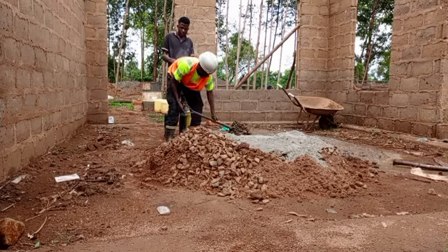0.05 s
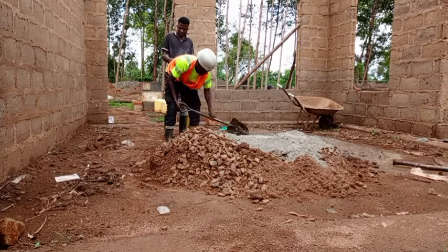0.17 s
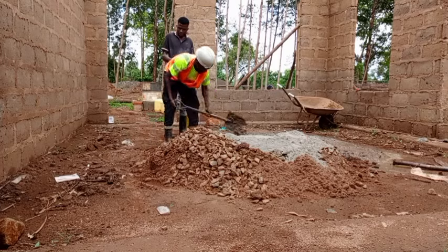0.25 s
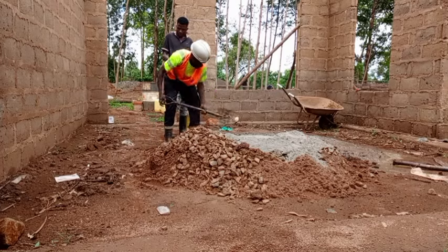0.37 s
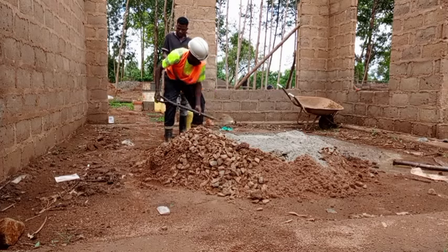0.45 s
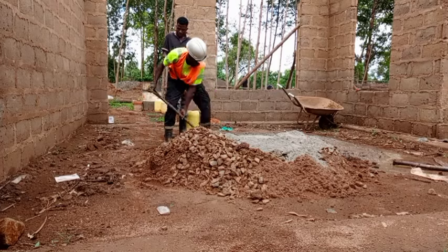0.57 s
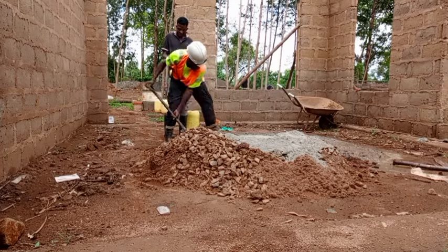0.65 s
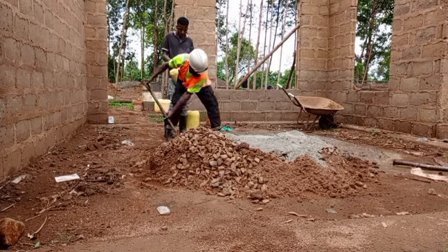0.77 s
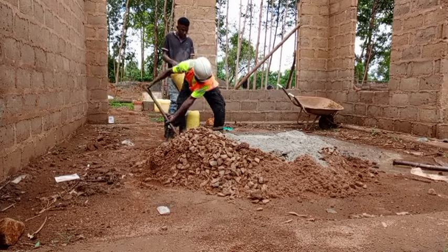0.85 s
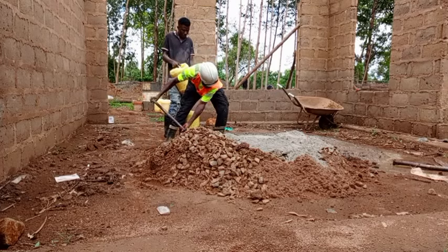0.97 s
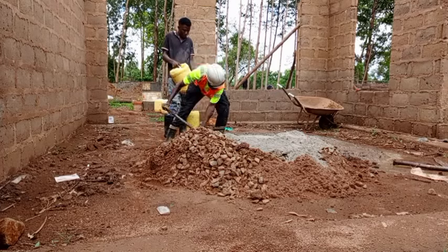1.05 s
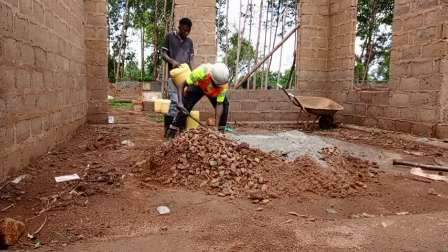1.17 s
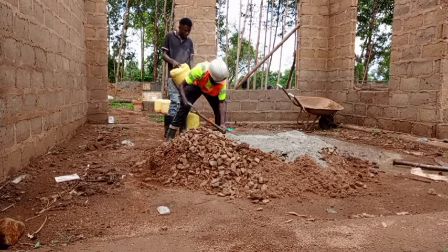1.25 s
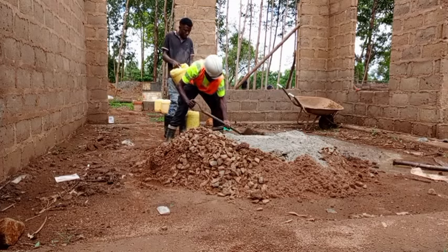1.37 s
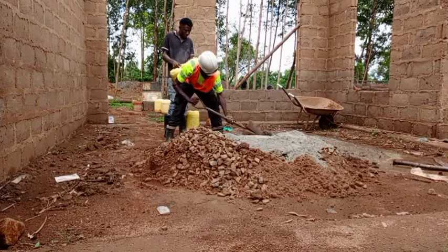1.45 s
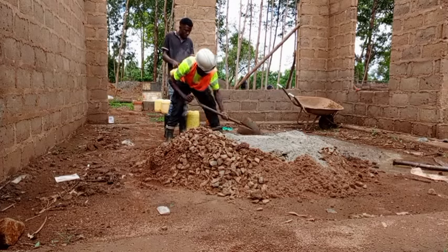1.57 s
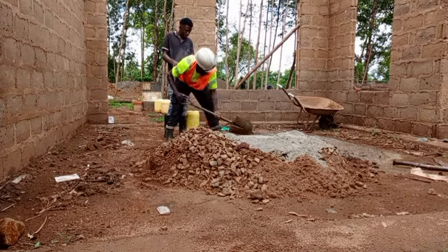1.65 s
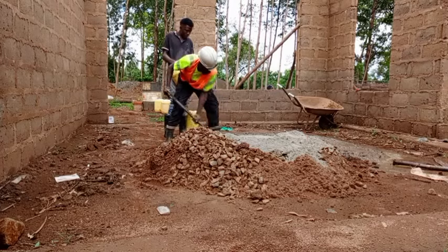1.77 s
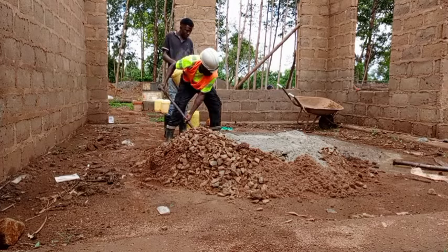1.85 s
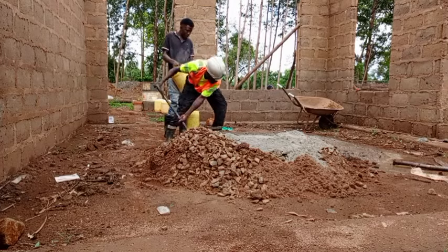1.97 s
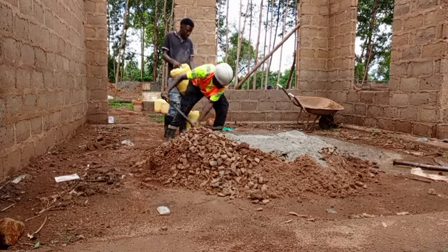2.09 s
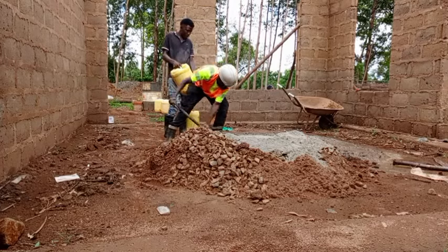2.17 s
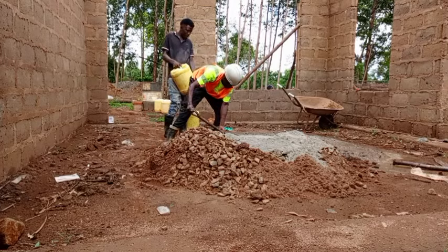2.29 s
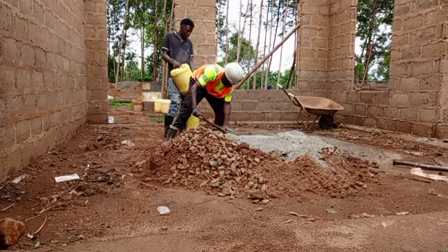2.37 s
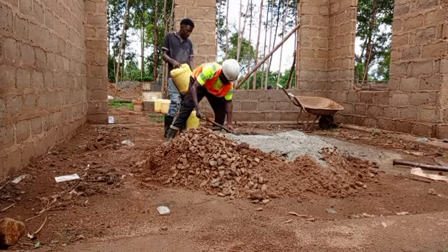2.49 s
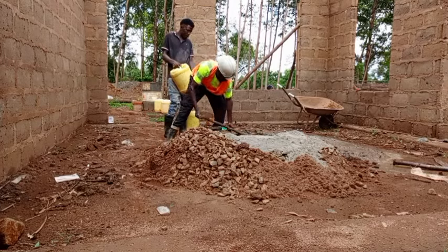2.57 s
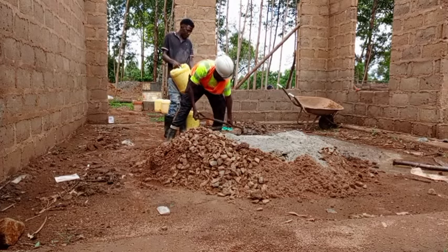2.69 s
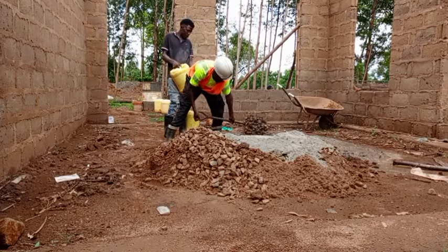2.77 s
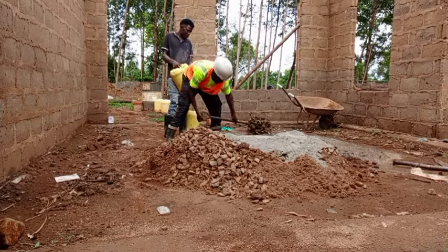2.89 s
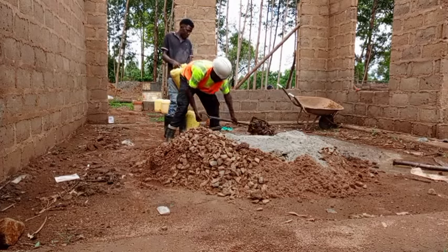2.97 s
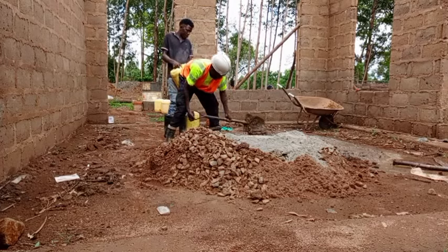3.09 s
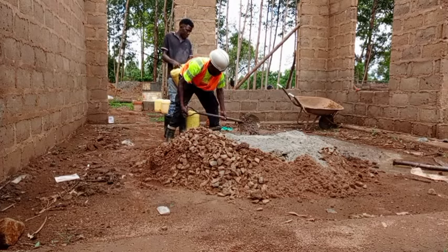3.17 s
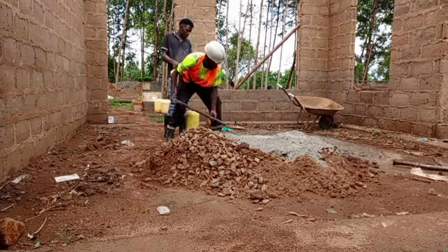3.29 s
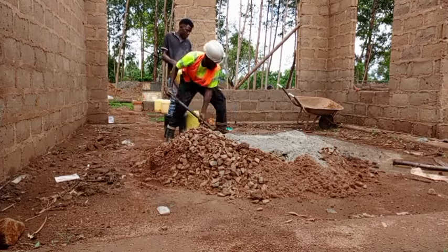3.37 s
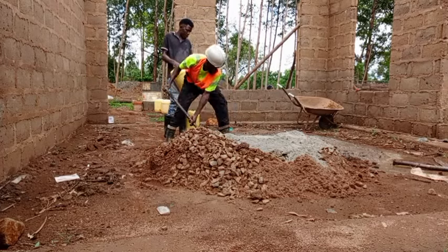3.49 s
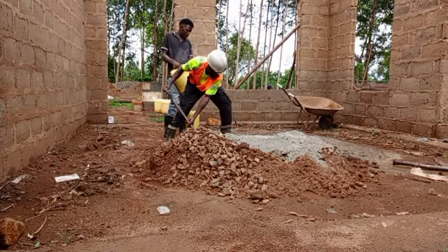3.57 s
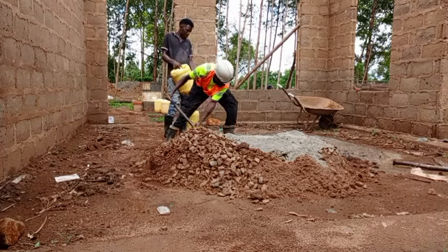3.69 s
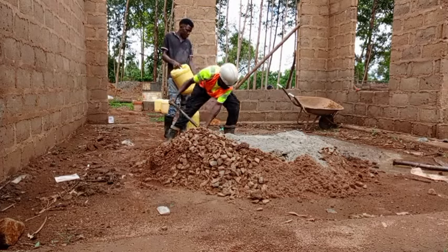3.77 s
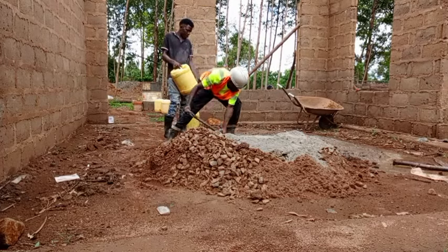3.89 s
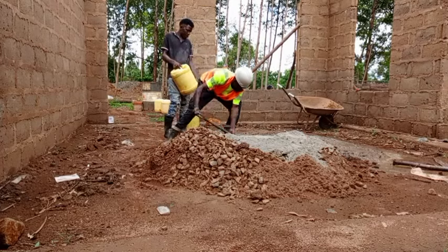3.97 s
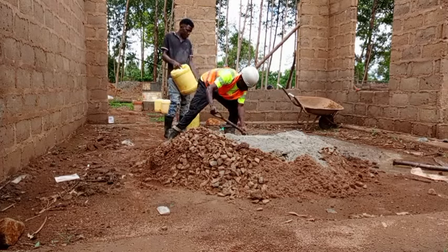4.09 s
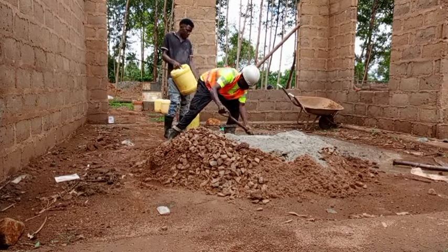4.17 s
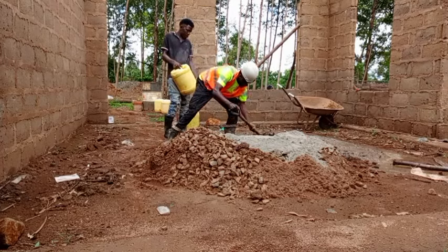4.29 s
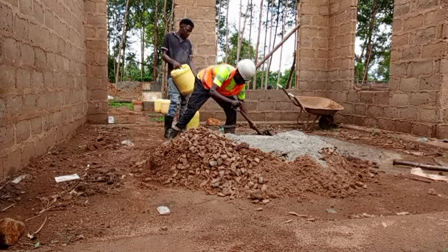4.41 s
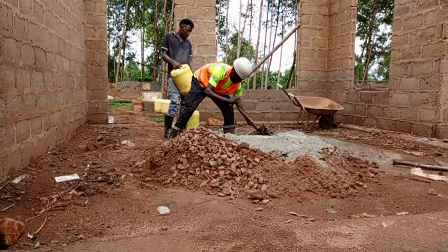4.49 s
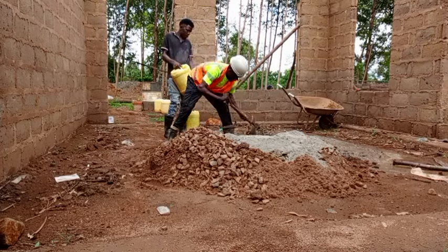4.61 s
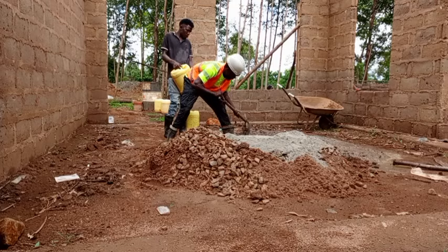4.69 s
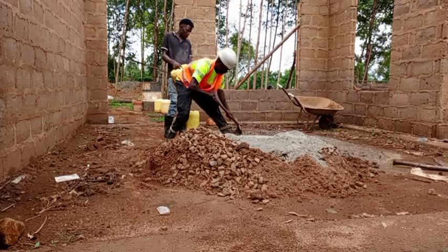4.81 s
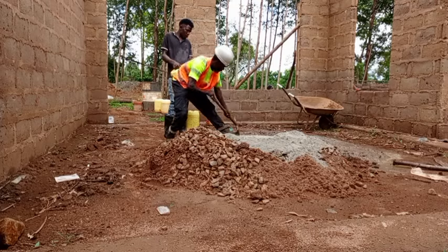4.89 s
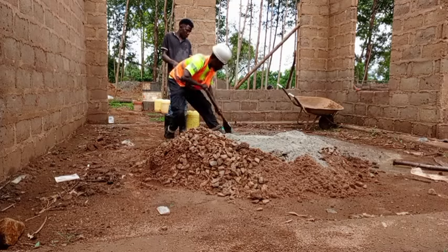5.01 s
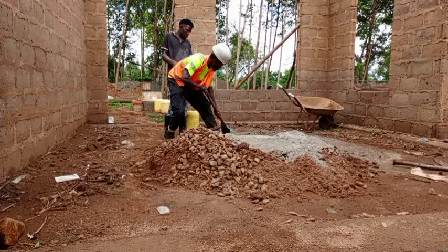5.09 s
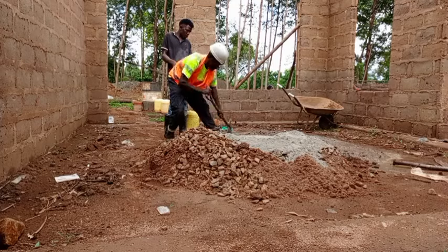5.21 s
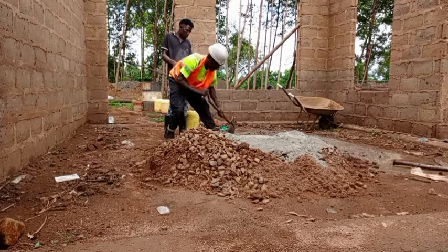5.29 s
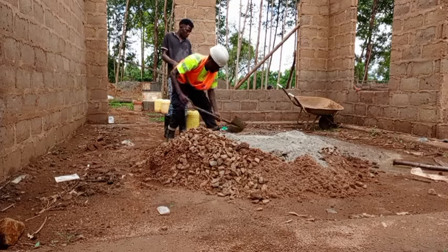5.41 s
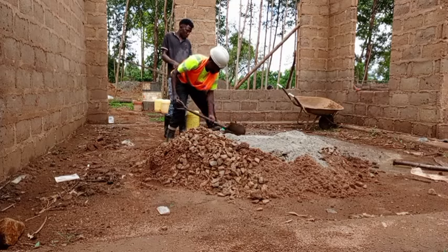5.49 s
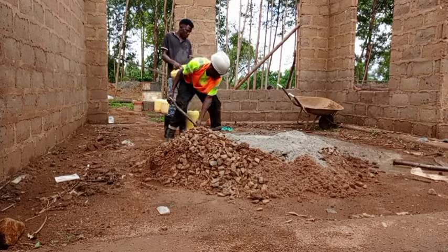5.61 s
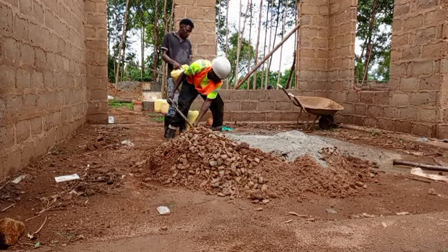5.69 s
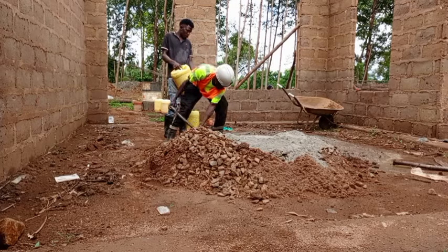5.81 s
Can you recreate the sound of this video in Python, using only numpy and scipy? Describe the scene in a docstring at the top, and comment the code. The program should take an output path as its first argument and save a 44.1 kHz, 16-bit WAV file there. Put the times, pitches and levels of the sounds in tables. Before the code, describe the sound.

A steel shovel repeatedly crunches and scrapes into gravel, stones clinking on the blade, over a faint, uneven low rumble.

```python
"""A steel shovel driven into a heap of gravel and cement, between roofless brick walls.
Stones knock in the heap and grate along the blade, grit makes the steel sing, sand hisses off it,
and single stones strike it with a crack, a clink and a thud. The near walls return short echoes.
Behind the work a low two-tone drone swells and drops out beneath a faint outdoor hush.
One microphone, with the deepest bass and the very top rolled off."""
import sys
import numpy as np
from scipy import signal
from scipy.fft import rfft, irfft, next_fast_len
from scipy.io import wavfile
from scipy.ndimage import uniform_filter1d

SR = 44100
rng = np.random.default_rng(int(sys.argv[2]) if len(sys.argv) > 2 else 0)


def file_out(sig):
    """Save sig as 16-bit WAV at sys.argv[1]."""
    # one column per channel
    cols = np.atleast_2d(sig).T
    # limit, then scale
    lim = np.clip(cols, -1, 1)
    pcm = np.round(lim * 32767).astype(np.int16)
    wavfile.write(sys.argv[1], SR, pcm)


N = 257984

# modes of the steel blade: (frequency [Hz], relative level [dB], t60 before damping [s])
BLADE_MODES = [(258, -30, 0.3), (398, -8, 0.2), (976, -20, 0.15), (1157, -24, 0.2), (2420, -18, 0.14),
               (2710, -15, 0.09), (3275, -5, 0.25), (3730, -13, 0.12), (3960, -10, 0.14), (4600, -6, 0.3),
               (4960, -8, 0.15), (5660, -11, 0.25), (5820, -7, 0.3), (6250, -15, 0.15), (6490, -12, 0.15),
               (6869, -13, 0.18)]
# colour of running sand: (frequency [Hz], relative level [dB])
SAND_SPECTRUM = [(6200, -15.5), (7200, -5), (8300, -11.5), (11000, -7), (13500, -13), (14800, -14.5),
                 (15600, -8.5), (16500, -15)]


def heap():
    """Rumble, knocks, grating, grit and sand as the blade shifts the load, in jerks they all share."""
    # colours of the moving gravel, deep to bright: (frequency [Hz], relative level [dB])
    rumble_spectrum = [(110, -16), (160, -11), (240, 2), (340, 10.5), (420, 8)]
    stone_spectrum = [(280, -31), (370, 4.5), (500, 6.5), (620, 6), (870, 2.5), (1100, -26)]
    grating_spectrum = [(750, -26), (920, 2), (1150, -5), (1520, -1.5), (1860, -9), (2550, -12),
                        (3100, -35.5)]
    grit_spectrum = [(2200, -12), (2700, -2.5), (3400, 5), (4300, 2.5), (5400, 2.5), (6500, -0.5),
                     (7200, -12.5), (8200, -33.5)]
    stones_db, rumble_db, grating_db, grit_db, free = strokes()
    sand_db = np.maximum(grit_db - 12.5, -91)    # a trickle that never stops
    jerks = drift(29)
    rumble = grains(rumble_spectrum, rumble_db, 0.53 * jerks, per_s=900, spread_db=3.5, cycles=33.5,
                    count=10)
    stones = grains(stone_spectrum, stones_db, 0.77 * jerks, per_s=900, spread_db=2, cycles=33, count=14)
    grating = grains(grating_spectrum, grating_db, 1.6 * jerks, per_s=4000, spread_db=2, cycles=73,
                     count=20, dull_db=13)
    grit = grains(grit_spectrum, grit_db, 2.3 * jerks, per_s=9000, spread_db=2.5, cycles=62)
    sand = grains(SAND_SPECTRUM, sand_db, 2.1 * jerks, per_s=7000, spread_db=2.5, cycles=270)
    steel_share = np.interp(free, [0, 1], [.08, .5])    # of the grit's power
    steel = np.sqrt(steel_share) * from_db(grit_db) * singing_blade()
    return rumble + stones + grating + np.sqrt(1 - steel_share) * grit + sand + steel


def strokes():
    """Levels of stones, rumble, grating and grit, and how free the blade is of its load (0-1)."""
    # heavy thrusts and throws, then light drags and knocks, one curve a stroke: (time [s], stones [dB],
    # rumble [dB above stones], grating [dB above stones], grit [dB above stones])
    thrusts = [
        [(0.93, -61.5, 6, -11, -4), (0.976, -29, -20, -6.5, -8), (1.01, -39, 5.5, 8.5, 5),
         (1.038, -23.5, -9.5, -11.5, -13.5), (1.064, -35.5, -1, -3.5, -8.5), (1.202, -36, -7.5, -9.5, -14),
         (1.256, -41, -10, -8, -20.5), (1.394, -43.5, 2.5, -6, -9), (1.5, -55, -20.5, 1.5, -12.5)],
        [(2.04, -94, 14, -41, -5), (2.062, -41.5, -4.5, -10, -4.5), (2.21, -30.5, -6.5, -0.5, -8),
         (2.23, -21.5, -4.5, -8.5, -13.5), (2.302, -30.5, 0, -1.5, -8), (2.424, -26.5, -6, -7, -14),
         (2.598, -44.5, 3, -8, -17), (2.702, -44, -4.5, -10.5, -13), (2.8, -63, -22.5, -5, -4.5)],
        [(2.81, -56, -25, 4, -3), (2.902, -51, -33, -8.5, -16.5), (2.944, -49, -16, 4.5, -0.5),
         (2.978, -48, -6.5, 1, -1), (3.118, -39.5, -20, -3, -5), (3.29, -56.5, 1, 4, -0.5),
         (3.352, -62, -7, 2, -13.5), (3.406, -72, -18, -19, -14), (3.45, -101, 21, 16, 8)],
        [(3.63, -66, -3.5, 3.5, 4), (3.734, -37, -9, -11.5, -15.5), (3.818, -39, -7.5, -2, -6.5),
         (3.856, -43, -7, 2, 0.5), (3.868, -33, -7, 3.5, -3.5), (3.952, -31, -11.5, -6, -8),
         (3.98, -29.5, -6, -3, -8), (4.056, -36, 0, -1, -4.5), (4.2, -34, 4, -7, -14.5)],
        [(4.21, -33, -8, -6.5, -13.5), (4.234, -40.5, 11, -5, -12), (4.252, -34.5, -1, -3, -14.5),
         (4.344, -36, 6, -3, -12.5), (4.492, -33.5, -16.5, -9, -16.5), (4.518, -41, -11.5, -1, -1),
         (4.69, -49.5, -10.5, -7, -5), (4.722, -51, -7.5, -4.5, -5), (4.75, -44.5, 4, -22, -23.5)],
        [(4.76, -47.5, -9.5, -11, -7), (4.826, -34.5, -5, -4.5, -4), (4.852, -37.5, -11, -4.5, -11.5),
         (4.976, -46, -10.5, -3.5, -1), (5.128, -37.5, -1, -4.5, -7.5), (5.19, -42.5, 3.5, -5.5, -13.5),
         (5.274, -55, -10, -4.5, -9.5), (5.32, -68.5, -33.5, -28, -35), (5.37, -85.5, 6.5, -6, 1.5)],
    ]
    drags = [
        [(0.0, -61.5, -11, 0, -11), (0.106, -54, -22.5, -10, -20), (0.198, -45.5, -47, 1, -1),
         (0.292, -55, -13, 1, -9), (0.354, -59, -34, -3.5, -6), (0.45, -92, 6, -18, 3)],
        [(0.62, -90, 9, -11, -2), (0.698, -69.5, 18, -7, -5), (0.768, -47, -7, -11, -23),
         (0.844, -62.5, 0, -3.5, -9), (0.856, -51.5, -8, -15, -27), (0.92, -68, 0, -19, -1)],
        [(1.51, -54.5, -32, -5, -10), (1.594, -52.5, -28, 7.5, 3), (1.692, -50, -28, -9, -12.5),
         (1.75, -59.5, -18, 3.5, -0.5), (1.818, -82, -4, 4, -8), (1.83, -101, -13, -24, -18)],
        [(1.84, -68, 1, -36, -21), (1.856, -43, -10, -4, 6.5), (1.89, -45, 9.5, -14, -1),
         (1.93, -56.5, 9, -14, 2), (1.998, -90, 14, -10, 20), (2.03, -93, 8, -2.5, -11)],
        [(3.47, -90, 17, -26, 19), (3.488, -66, -1, -16, -13), (3.496, -49, -16, -13, -15),
         (3.524, -44, -2, -9.5, -13.5), (3.578, -60.5, -12, -9, -10.5), (3.62, -65.5, 13, -17, -14)],
        [(5.73, -83, -4, -14.5, -13), (5.762, -64, -18, -7, 2.5), (5.778, -51.5, -21, -14, -11.5),
         (5.808, -49, 0.5, -4.5, -4.5), (5.838, -44, -21, -10, -15), (5.85, -51, 1, -4, -4)],
    ]
    times, *columns = np.transpose(sorted(row for stroke in thrusts + drags for row in stroke))
    stones_db, *above_db = [np.interp(np.arange(N) / SR, times, column) for column in columns]
    rumble_db, grating_db, grit_db = stones_db + np.array(above_db)
    free = np.interp(grit_db, [-59, -50], [1, 0])    # loud grit means a buried blade
    for stroke in drags:
        free[int(stroke[0][0] * SR):int(stroke[-1][0] * SR)] = 1    # a dragged blade carries no load
    return stones_db, rumble_db, grating_db, grit_db, uniform_filter1d(free, size=441)


def grains(spectrum, level_db, jerk_db, per_s, spread_db, cycles, count=26, dull_db=0):
    """Random contacts of uneven size, each ringing for some cycles at one of `count` pitches."""
    sizes = from_db(spread_db * np.minimum(rng.exponential(1, N), 5)) * rng.choice([-1, 1], N)
    contacts = sizes * (rng.random(N) < per_s / SR)
    pitch_index = rng.integers(0, count, N)
    light = np.clip((level_db.max() - level_db - 19.5) / 16, 0, 1)    # 0 full thrust, 1 light drag
    patchy_db = 2 + 3 * light    # a light drag lets a few pitches sing at a time
    low_hz, high_hz = spectrum[1][0], spectrum[-2][0]
    pitches = np.geomspace(low_hz, high_hz, count) * rng.uniform(.985, 1.015, count)
    out, power = np.zeros(N), np.zeros(N)
    for k, hz in enumerate(pitches):
        ringing = ring(contacts * (pitch_index == k), hz, cycles / hz)
        pitch_db = at_hz(spectrum, hz) - dull_db * light * k / count + patchy_db * drift(6.5)
        gain = from_db(pitch_db) * np.sqrt(hz)    # log-spaced pitches cover more Hz higher up
        out += gain * rms_one(ringing)
        power += gain ** 2
    skirts = [(spectrum[0][0] / 2, -60), spectrum[0], (low_hz, 0),
              (high_hz, 0), spectrum[-1], (spectrum[-1][0] * 2, -60)]
    return from_db(level_db + jerk_db) * coloured(out / np.sqrt(power), skirts)


def singing_blade(per_s=1500, damped_t60_s=.03):
    """Sliding grit rings the upper blade modes by turns, damped by a film of gravel; rms 1."""
    out = np.zeros(N)
    for hz, level_db, t60 in BLADE_MODES:
        if 2600 < hz < 7000:
            taps = (rng.random(N) < per_s / SR) * rng.standard_normal(N)
            ringing = rms_one(ring(taps, hz, min(t60, damped_t60_s)))
            out += from_db(level_db / 2 + 5 * drift(8)) * ringing
    return rms_one(out)


def stone_strikes(crack_s=.0026, spray_s=.006, thud_t60_s=.2, blade_t60_s=.14):
    """Each stone cracks, clinks, thuds, sprays sand and rings the blade, more so when it is empty."""
    # single stones on the steel: (time [s], crack base level [dB], clink pitch [Hz],
    # thud base level [dB], thud pitch [Hz])
    hits = [(0.0034, -55, 3870, -56, 380), (0.0327, -48, 2710, -52, 630), (0.046, -49.5, 2300, -56, 600),
            (0.1364, -48, 5290, -32.5, 672), (0.176, -41, 2720, -34, 660), (0.2398, -51, 2570, -37, 676),
            (0.2977, -42, 3570, -47, 795), (0.6733, -58, 4900, -67, 320), (0.955, -38, 3080, -34, 390),
            (0.9688, -25.5, 2320, -20.5, 710), (1.0328, -14, 2310, -8, 720),
            (1.1494, -36, 2130, -18.5, 729), (1.1914, -34, 2180, -21.5, 635),
            (1.3535, -37.5, 3680, -50, 282), (1.412, -48, 3490, -44, 404), (1.5574, -58, 5500, -34, 730),
            (1.726, -47, 3480, -53.5, 708), (1.779, -55, 3970, -52.5, 500), (1.8533, -27, 3275, -30, 398),
            (1.8585, -28, 4960, -28, 370), (2.07, -34, 5200, -32, 482), (2.0644, -34, 3230, -21.5, 359),
            (2.1378, -36, 4880, -22, 724), (2.1626, -22, 3270, -23, 530), (2.176, -19, 2050, -11.5, 657),
            (2.2093, -19.5, 2040, -30, 660), (2.2321, -35, 2090, -6, 628), (2.3426, -31, 5460, -18, 507),
            (2.3821, -25, 5600, -8.5, 502.5), (2.4806, -27.5, 2030, -19, 590),
            (2.7503, -47.5, 4300, -54, 490), (2.8156, -52, 2030, -37, 590), (2.8828, -48, 2000, -47, 610),
            (2.927, -41, 1990, -48, 955), (3.0445, -33, 3420, -23.5, 461), (3.157, -26.5, 4050, -53, 534),
            (3.2625, -33, 3260, -50, 1035), (3.456, -55.5, 4420, -66, 333), (3.493, -60, 3780, -29, 443),
            (3.6431, -54, 4000, -36, 705), (3.7223, -30, 2360, -41, 470), (3.7766, -38, 4450, -23, 690),
            (3.8305, -21, 2250, -19, 721), (3.8678, -26.5, 2230, -8.5, 632), (4.135, -28, 3530, -17, 599),
            (4.2543, -24.5, 2100, -15, 752), (4.6037, -33.5, 3620, -29, 712),
            (4.7165, -40.5, 6400, -32.5, 467), (4.8282, -24, 2190, -18, 733), (4.8984, -30, 3490, -26, 465),
            (5.0188, -33, 4800, -24.5, 393), (5.1028, -25, 4840, -34.5, 683),
            (5.765, -54, 6980, -46.5, 559)]
    times, cracks_db = np.transpose(hits)[:2]
    starts = np.round(times * SR).astype(int)
    free = strokes()[-1][np.maximum(starts - SR // 40, 0)]    # 25 ms before each hit
    ring_db = cracks_db - 24 + 15 * free
    scatter_db = rng.normal(0, 0.82, (len(hits), len(BLADE_MODES)))
    out, sprays = np.zeros(N), np.zeros(N)
    for k, (hz, level_db, t60) in enumerate(BLADE_MODES):
        blows = np.zeros(N)
        blows[starts] = from_db(ring_db + level_db + scatter_db[:, k])
        out += ring(blows, hz, min(t60, blade_t60_s))
    click = signal.unit_impulse(SR // 5)
    crack_decay = np.exp(-np.arange(len(click)) / (crack_s * SR))
    for start, empty, (_, crack_db, clink_hz, thud_db, thud_hz) in zip(starts, free, hits):
        splinters = rng.standard_normal(len(click)) * crack_decay
        snap = band_pass(splinters - 0.75 * click, 0.35 * clink_hz, 1.3 * clink_hz)
        crack = from_db(crack_db + 2 - 6 * empty) * snap    # an empty blade pings more than it cracks
        clink = from_db(crack_db - 7) * ring(click, clink_hz, t60=.036 + .035 * empty)
        overtone = 0.62 * ring(click, 1.25 * thud_hz, 0.053 * thud_t60_s)
        thud = from_db(thud_db - 12.5) * (ring(click, thud_hz, thud_t60_s) + overtone)
        out[start:start + len(click)] += (crack + clink + thud)[:N - start]
    sprays[starts] = from_db(cracks_db - 28.5)
    spray_envelope = signal.lfilter([1], [1, -np.exp(-1 / (spray_s * SR))], sprays + 1e-18)
    return out + spray_envelope * coloured(rng.standard_normal(N), [(3000, -36.5)] + SAND_SPECTRUM)


def wall_echoes(x, t60_s=.11, cut_hz=4200):
    """Sound bounces between the brick walls on eight paths of 12-40 ms, duller on every round."""
    out, pole = np.zeros(N), np.exp(-2 * np.pi * cut_hz / SR)
    for k, lag in enumerate((rng.uniform(.012, .04, 8) * SR).astype(int)):
        loop, state = x.copy(), [0.]
        gain = from_db(-60 * lag / SR / t60_s)
        for i in range(lag, N, lag):
            echo, state = signal.lfilter([gain * (1 - pole)], [1, -pole], loop[i - lag:i], zi=state)
            loop[i:i + lag] += echo[:N - i]
        out += (loop - x) * (-1) ** k
    return out


def drone(low_hz=78.3, upper_hz=104.8, rumble_hz=60.3):
    """Two unsteady low tones beat against each other; a lumpy rumble rides with the lower one."""
    # when each tone sounds: (start [s], end [s], start level [dB], end level [dB])
    low_spells = [(-0.05, .09, -34, -60), (.22, .31, -47, -52), (.38, 1.12, -42.5, -41),
                  (1.46, 1.9, -46, -54), (2.0, 2.2, -53.5, -62), (2.49, 2.66, -35.5, -57),
                  (2.79, 3.24, -40, -41.5), (3.28, 3.63, -44, -39.5), (3.81, 4.2, -40, -45),
                  (4.33, 4.54, -35.5, -46), (4.59, 4.69, -38.5, -56), (4.84, 5.31, -33.5, -44.5),
                  (5.38, 5.57, -41, -47.5), (5.63, 5.77, -43.5, -55.5)]
    upper_spells = [(.43, .7, -53.5, -59), (2.34, 2.62, -46, -46), (2.8, 3.0, -52, -57),
                    (3.4, 3.66, -52, -43.5), (4.37, 4.45, -44, -50), (4.85, 4.98, -36.5, -47),
                    (5.5, 5.7, -56.5, -52.5)]
    low_db = spell_levels(low_spells)
    upper_db = np.maximum(spell_levels(upper_spells), low_db - 16.5)    # also follows the lower tone
    low = tone(low_hz + 1.1 * drift(3.5)) * from_db(low_db + 3.2 * drift(2.8))
    upper = tone(upper_hz + 3 * drift(6)) * from_db(upper_db + 4.7 * drift(11))
    rumble = band_pass(rng.standard_normal(N), 0.86 * rumble_hz, 1.3 * rumble_hz)
    return low + upper + from_db(low_db - 12.5) * rms_one(rumble)


def spell_levels(spells, rise_db_per_s=904, fall_db_per_s=597, silent_db=-82):
    """Level in dB: each spell rises steeply, slides from its first level to its last and falls away."""
    t, curves = np.arange(N) / SR, []
    for start, end, first_db, last_db in spells:
        onset = start - (first_db - silent_db) / rise_db_per_s
        gone = end + (last_db - silent_db) / fall_db_per_s
        curves.append(np.interp(t, [onset, start, end, gone], [silent_db, first_db, last_db, silent_db]))
    return np.max(curves, axis=0)


def hush(air_db=-76, tone_hz=186, tone_db=-79):
    """Faint outdoor air, wavering a little, with a thin tone in it."""
    # colour of the open air: (frequency [Hz], relative level [dB])
    air_spectrum = [(76, -14), (130, 1), (150, -1.5), (186, -1.5), (228, -35.5), (290, -13), (340, -13.5),
                    (497, -18.5), (5500, -21.5), (7890, -37.5), (15600, -46)]
    thin_tone = tone(tone_hz + 1.2 * drift(5.7)) * from_db(tone_db + drift(3))
    air = from_db(air_db + 1.6 * drift(5)) * coloured(rng.standard_normal(N), air_spectrum)
    return thin_tone + air


def from_db(db):
    """dB to gain."""
    return 10 ** (np.asarray(db) / 20)


def rms_one(x):
    """Scaled to rms 1."""
    return x / np.sqrt(np.mean(x ** 2) + 1e-20)


def at_hz(spectrum, hz):
    """A spectrum read on a log-frequency axis."""
    frequencies, levels_db = np.transpose(spectrum)
    return np.interp(np.log(hz), np.log(frequencies), levels_db)


def drift(rate_hz):
    """Slow random wander of spread 1: low-passed noise, drawn at every 40th sample."""
    pole = np.exp(-80 * np.pi * rate_hz / SR)
    slow = signal.lfilter([1], [1, -2 * pole, pole * pole], rng.standard_normal(N // 40 + 2002))[2000:]
    return np.interp(np.arange(N) / 40, np.arange(len(slow)), rms_one(slow))


def tone(hz):
    """A sine that follows a pitch curve."""
    return np.sin(2 * np.pi * np.cumsum(hz) / SR)


def ring(clicks, hz, t60):
    """A unit click sets a decaying sine of height 1 ringing."""
    r, w = from_db(-60 / (t60 * SR)), 2 * np.pi * hz / SR
    return signal.lfilter([0, np.sin(w)], [1, -2 * r * np.cos(w), r * r], clicks + 1e-18)


def band_pass(x, low_hz, high_hz):
    """Keeps one band, with gentle slopes."""
    return signal.sosfilt(signal.butter(2, [low_hz, high_hz], "band", fs=SR, output="sos"), x)


def coloured(x, spectrum):
    """Filters a signal by a spectrum; rms 1."""
    size = next_fast_len(N)
    hz = np.maximum(np.arange(size // 2 + 1) * SR / size, 1)
    return rms_one(irfft(rfft(x, size) * from_db(at_hz(spectrum, hz)), size)[:N])


def scene():
    """What reaches the microphone: the shovel, its echoes off the walls, the drone and the hush."""
    shovel = heap() + stone_strikes()
    return (shovel + from_db(-10.5) * wall_echoes(shovel) + drone() + hush())[None]


def record(dry, low_cut_hz=48, high_cut_hz=15730):
    """The microphone drops the deepest bass; the top is cut steeply."""
    lean = signal.sosfilt(signal.butter(2, low_cut_hz, "high", fs=SR, output="sos"), dry)
    return signal.sosfilt(signal.ellip(16, .5, 90, high_cut_hz, fs=SR, output="sos"), lean)


dry = scene()
out = record(dry)
file_out(out)
```